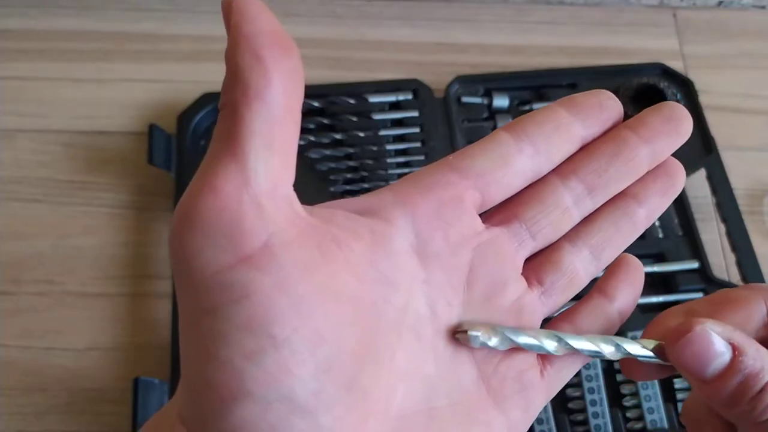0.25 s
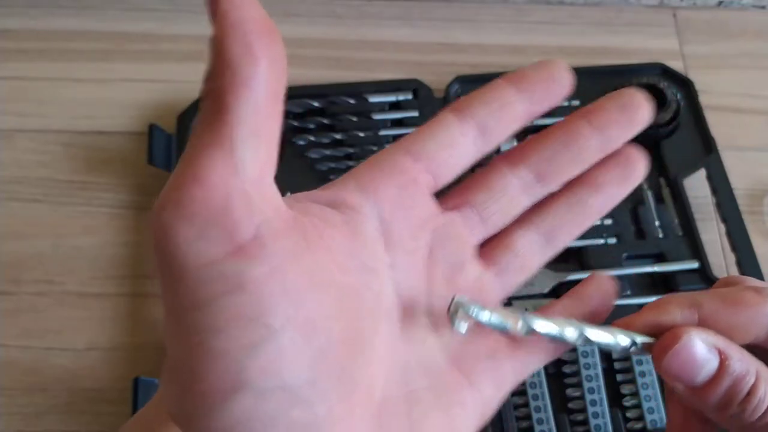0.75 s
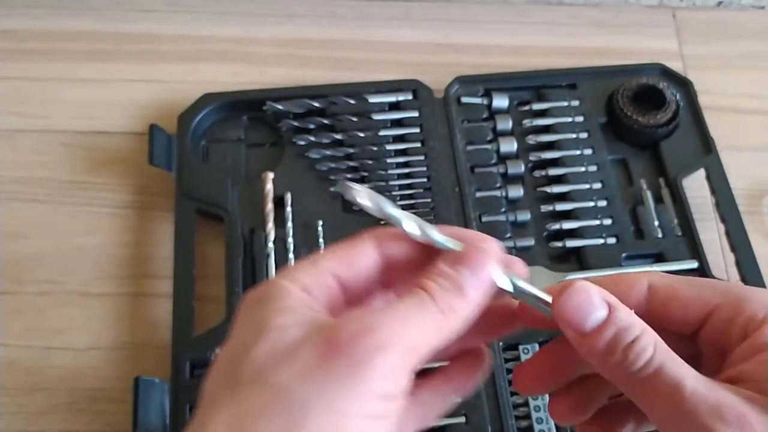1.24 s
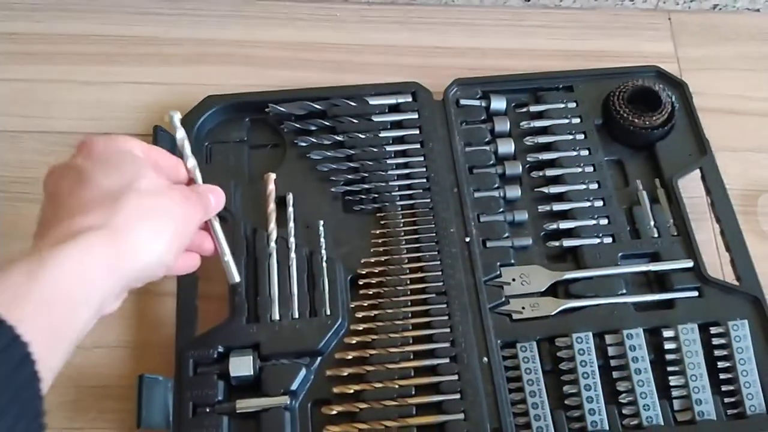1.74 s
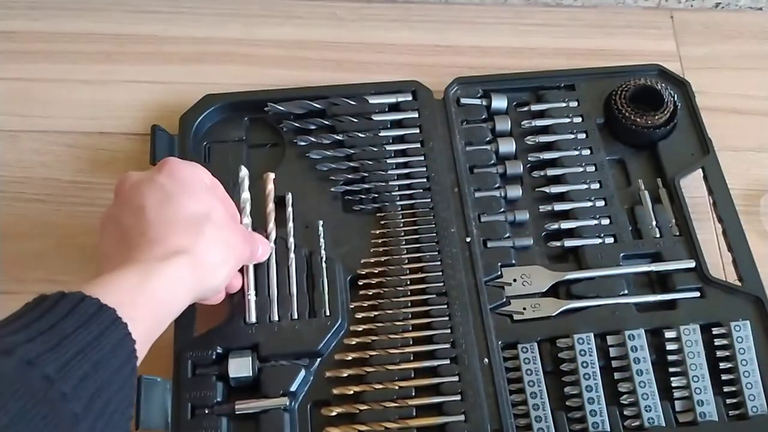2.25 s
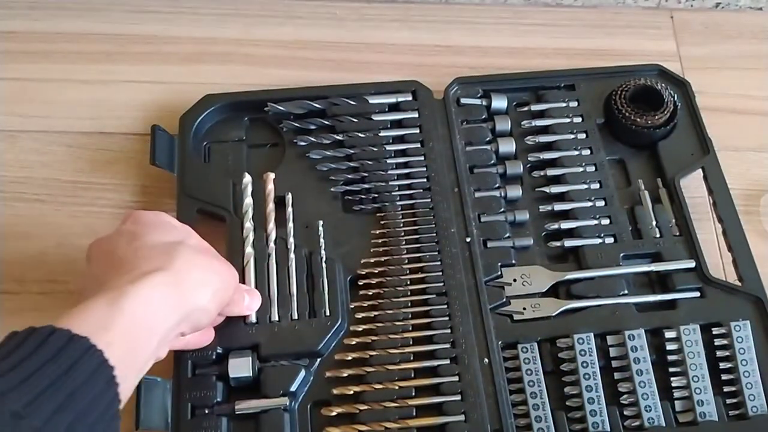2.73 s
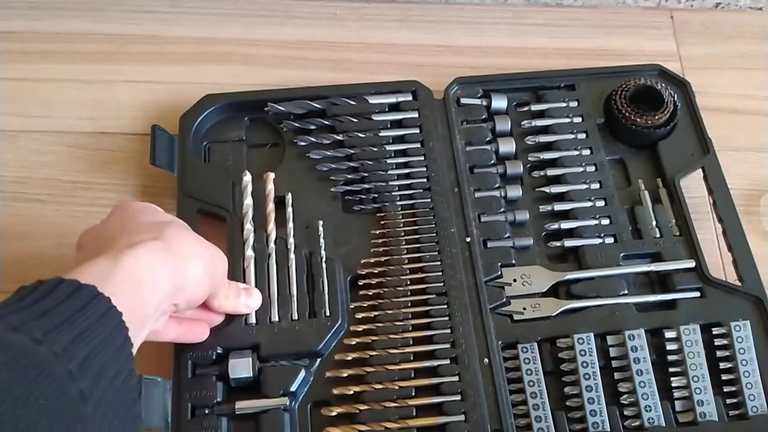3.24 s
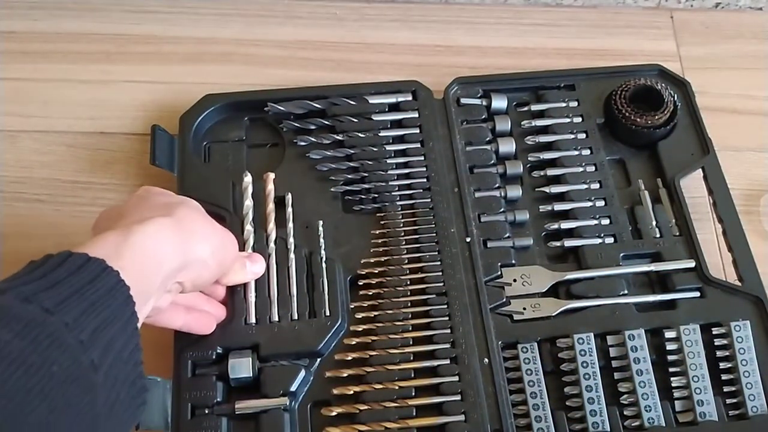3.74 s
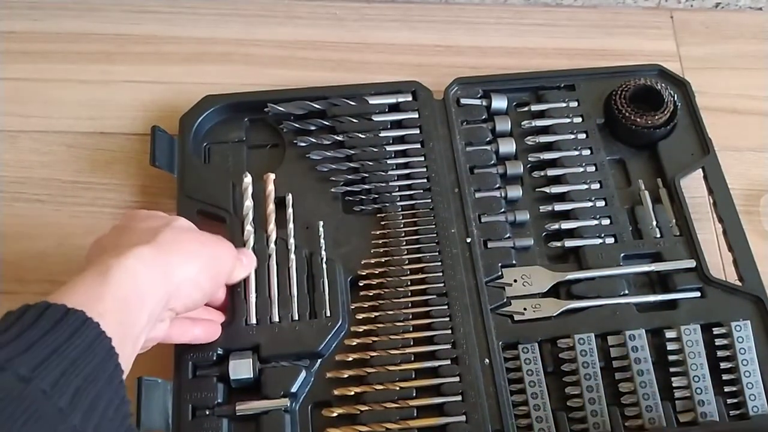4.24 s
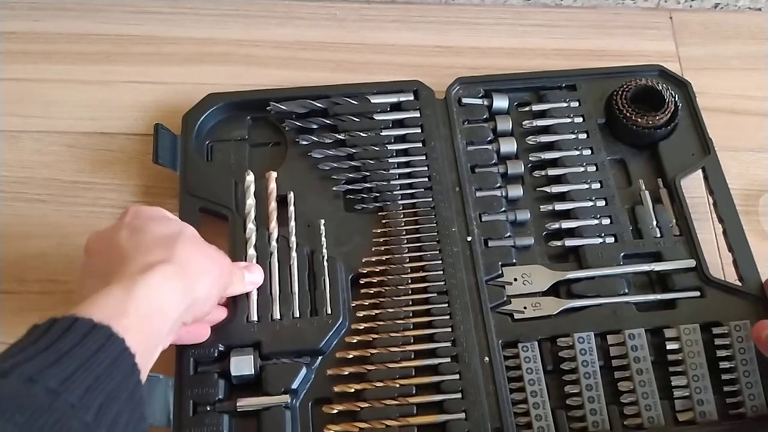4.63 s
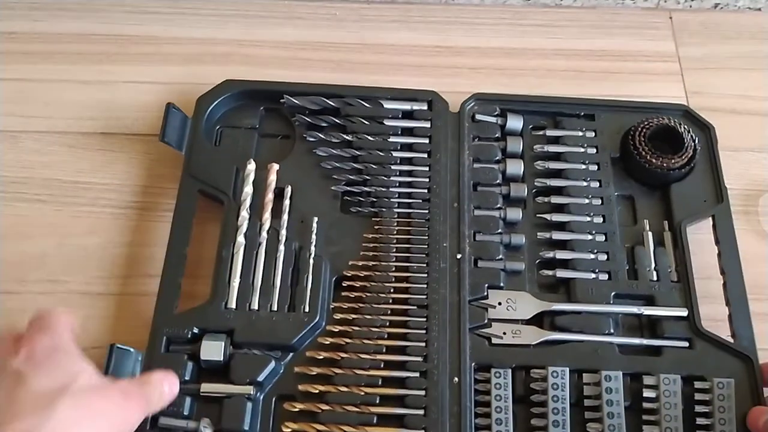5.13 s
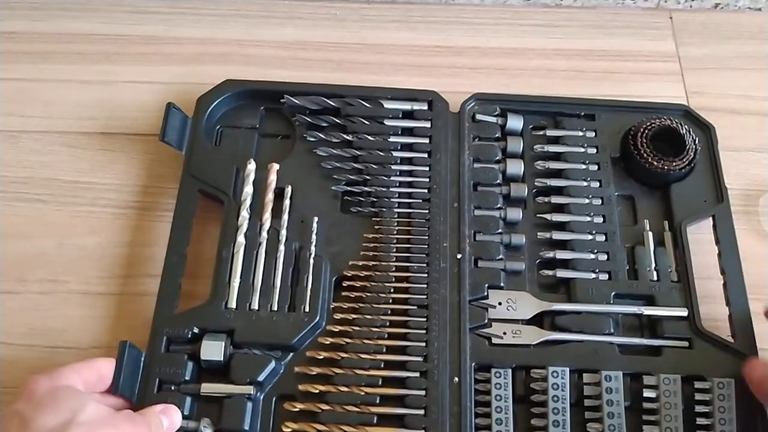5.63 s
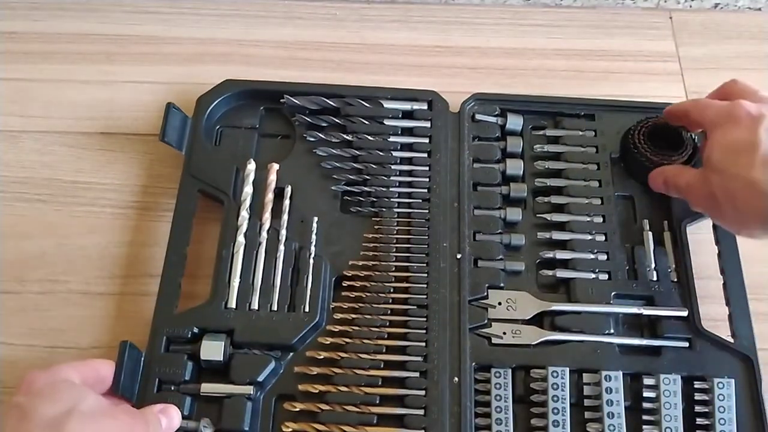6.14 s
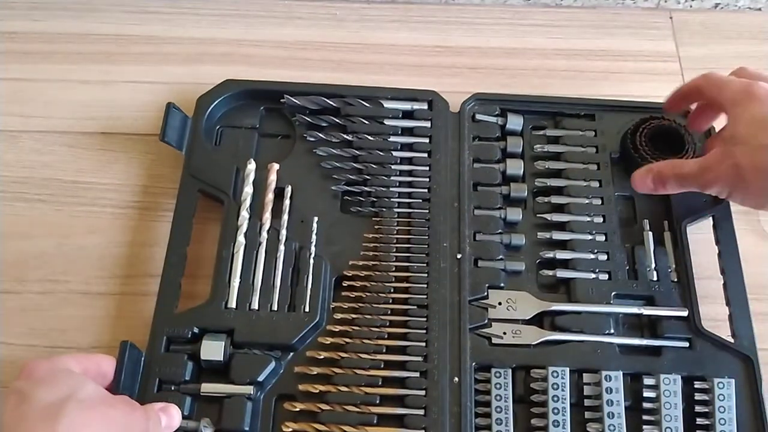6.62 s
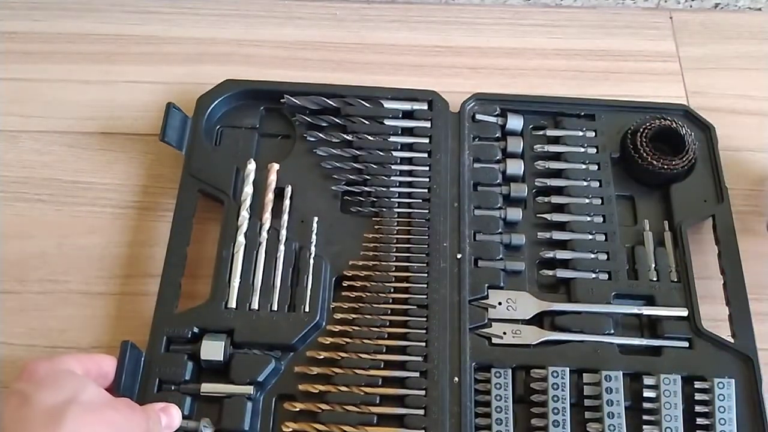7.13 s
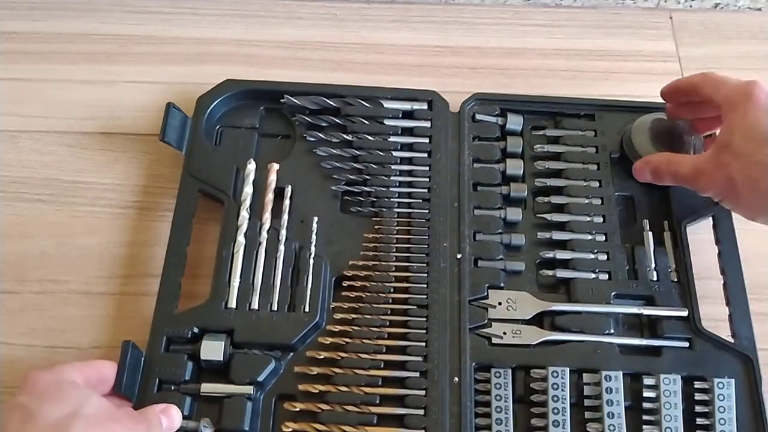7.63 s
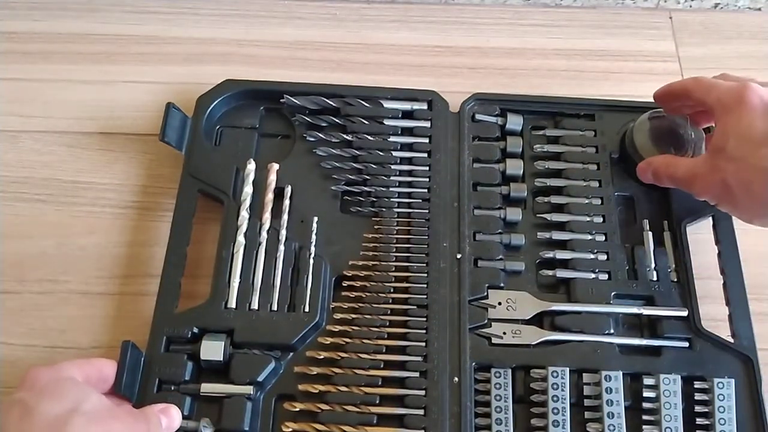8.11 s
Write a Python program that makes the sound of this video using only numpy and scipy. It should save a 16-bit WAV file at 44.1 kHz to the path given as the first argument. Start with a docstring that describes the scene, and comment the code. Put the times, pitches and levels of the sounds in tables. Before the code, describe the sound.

A quiet hard room with soft broadband noise and a thin treble hiss, heard close in stereo. Around 1 second skin brushes very faintly. At 2.0 a steel bit knocks lightly on a hollow plastic case; at 2.3 a firmer cluster of plastic clacks; at 3.0 one loud, bright snap into the clip, with a low floor thud and a short room tail. From 3.4 to 4.8 there are faint rubs while low fluttering air gusts buffet almost only the left side, strongest near 4.2 to 4.6. From 4.8 to 5.2 the case drags over boards with a grainy, hissy scrape. Soft brushing and small ticks follow, busiest at 6.2 to 6.7. From 7.04 a light cap taps with dull hollow tones; at 7.6 it touches again, slides, clicks clearly at 8.03, and gives a last sharp tick at 8.35.

```python
"""A quiet hard room with a thin treble hiss; skin and plastic brush softly over a hollow case.
A steel bit is laid into the case on a wooden floor and snapped into its clip: banks of decaying modes.
Bass gusts buffet almost only the left microphone port; the case drags over boards as grainy noise.
Last a small cap is fitted onto a ring of cutters: ticks, rim modes and pitched air in the cup.
The room answers with noise tails that die band by band."""
import sys
import numpy as np
from scipy import signal
from scipy.fft import rfft, irfft, next_fast_len
from scipy.io import wavfile
from scipy.ndimage import uniform_filter1d

SR = 44100
rng = np.random.default_rng(int(sys.argv[2]) if len(sys.argv) > 2 else 0)


def to_wav(sig):
    """Store sig (one row per channel, or 1-D mono) as 16-bit WAV at the path in sys.argv[1].

    Samples outside -1..1 are clipped; the rate is SR.
    """
    pcm = np.clip(np.atleast_2d(sig), -1, 1) * 32767
    pcm = np.round(pcm).astype(np.int16)
    wavfile.write(sys.argv[1], SR, pcm.T)  # frames by channels


N = 369116

# steady room noise: pitch_hz, density_db (relative, per Hz)
QUIET = [(20, 10), (32, -7.5), (44, -13.5), (60, -5.5), (95, -14), (155, -7), (195, -25.5), (250, -2.5),
         (300, -16.5), (420, -19), (700, -25), (1400, -30), (3500, -35), (7000, -38.5), (13000, -37),
         (16000, -45.5)]
# strokes of skin and plastic over the case: start_s, hold_s, hiss_db, wall_db
RUBS = [(1.0, .06, -69, -100), (1.18, 0.062, -69, -96), (2.09, 0.037, -66, -84), (2.8, 0.035, -56.5, -71),
        (3.4, 0.073, -59, -73), (3.57, 0.023, -80, -66), (4.205, 0.025, -59, -62.5),
        (4.262, 0.031, -60, -58), (4.62, 0.0084, -55.5, -77), (4.64, 0.033, -49, -58.5),
        (4.69, .02, -62, -62), (4.725, 0.01, -55, -70), (4.76, 0.03, -64, -67), (5.275, 0.095, -62, -63.5),
        (5.43, 0.093, -69, -67.5), (5.62, 0.13, -63.5, -72), (5.81, 0.079, -56, -89),
        (5.98, 0.041, -67.5, -73), (6.24, 0.016, -47, -52), (6.28, 0.02, -56, -53.5),
        (6.36, 0.0096, -57, -57.5), (6.435, 0.0078, -54, -77), (6.455, 0.033, -51.5, -56.5),
        (6.51, 0.04, -53, -79), (6.65, 0.049, -60.5, -77.5)]
# case dragged over the boards, breakpoints: time_s, hiss_db, wall_db
DRAGGING = [(4.785, -54, -63), (4.82, -46.5, -66), (4.855, -39, -63), (4.876, -38.5, -75), (4.92, -42, -63),
            (4.97, -40.5, -51.5), (5.03, -41, -55.5), (5.081, -43.5, -50), (5.129, -46.5, -56.5),
            (5.17, -73, -70)]
# slides of the cap in the fingers and over the teeth: start_s, hold_s, hiss_db, cup_db, cup_air_hz
SLIDES = [(7.047, 0.018, -63, -62, 1983), (7.089, 0.023, -87, -62.5, 1810),
          (7.586, 0.013, -60.5, -72.5, 1490), (7.641, 0.024, -66, -48, 1593),
          (7.888, 0.044, -62.5, -58.5, 1450), (7.918, 0.04, -76.5, -57, 1445),
          (7.998, 0.04, -73, -60, 1444), (8.083, 0.053, -87, -61, 1498), (8.209, 0.022, -59.5, -56.5, 1354),
          (8.264, 0.058, -64.5, -61.5, 1350), (8.352, 0.016, -64, -50, 1454)]
# friction hiss: pitch_hz, density_db (relative, per Hz)
HISS = [(1500, -1.5), (2500, -0.5), (4000, -4), (6000, -3), (8000, -1), (11000, 3), (13500, -2),
        (16000, -16)]
# case wall driven by friction: pitch_hz, density_db (relative, per Hz)
DRAG = [(120, -42), (200, -11.5), (346, -13.5), (379, 17), (531, -37), (1130, -15), (1320, -14.5),
        (2440, -16.5), (4500, -60), (5850, -65.5), (9900, -120)]
# bit, fingers and loose tools against the case:
# start_s, tick_db, steel_db, clip_db, edge_db, wall_db, hollow_db, left_minus_right_db
KNOCKS = [(1.9907, -44, -44, -33.5, -25, -41, -36.5, 0.5), (1.9925, -63, -53, -26, -39, -29, -60, -3.5),
          (1.9955, -62, -52, -29, -45, -26, -57, 2), (2.003, -60, -62, -43, -37, -40, -61, -2),
          (2.010, -51, -56, -51, -52, -50, -39.5, 3), (2.039, -51, -66, -47, -42, -40, -42, 1),
          (2.048, -58, -62, -53, -55, -38, -52, -5), (2.11, -49, -65, -62, -64, -63, -70, -3),
          (2.165, -52, -65, -44.5, -46, -28, -39, -0.5), (2.1852, -68, -70, -66, -66, -42, -55, -2),
          (2.3224, -32, -51, -46, -32, -52, -30.5, 6), (2.3242, -47, -54, -26, -36, -32, -35.5, 5),
          (2.3262, -26.5, -38, -24.5, -20, -26.5, -25, 1.5),
          (2.3302, -55, -60, -31, -26.5, -23.5, -35.5, 1), (2.340, -41, -49, -27.5, -25.5, -51, -54.5, 0.5),
          (2.3547, -57, -56, -42, -35, -23, -35.5, -2), (2.387, -59, -57, -44, -31.5, -35, -34.5, 0),
          (2.803, -50, -67, -53, -62, -78, -57, 2), (2.996, -9.5, -10, -9.5, -8, -15.5, -24.5, -3),
          (2.9992, -33, -28, -22.5, -20, -14.5, -69, -5), (3.0035, -34, -22, -20, -25, -16.5, -39.5, -4),
          (3.0115, -18.5, -27.5, -31, -40, -47, -70, -12), (3.0155, -28, -27.5, -32, -45, -38, -67, 0),
          (3.025, -26, -29.5, -29, -30, -31, -35.5, 4), (3.4625, -39.5, -75, -74, -69.5, -55, -65.5, 4),
          (3.583, -61, -56, -68, -68.5, -71, -76, 13.5), (4.1748, -51, -58, -60.5, -61, -79, -61.5, 9),
          (4.259, -50, -55, -60.5, -50, -48, -72, -6), (4.287, -48, -62, -70.5, -70, -66.5, -73.5, 4),
          (4.367, -59, -64, -79, -69, -72, -72, -5), (4.8683, -29.5, -33, -37, -37, -43, -54, 1),
          (5.2095, -42, -56, -52, -56, -57, -59, 2.5), (5.2754, -50, -64, -65, -51, -78, -59, 1),
          (6.119, -53, -62, -47.5, -47, -44.5, -59, 2.5), (6.2118, -50, -69, -72, -71, -68, -73, 3),
          (6.235, -47, -57, -54, -54, -53, -53, 2), (6.2461, -40.5, -63, -66, -61, -38, -57, -2),
          (6.2835, -53, -52, -47, -47, -40, -64, 0.5), (6.415, -53, -70, -72, -73, -75, -75, 0),
          (6.4827, -30, -64, -67, -52, -63, -68, 1), (6.612, -41.5, -52, -56, -52.5, -55, -59.5, 3),
          (6.7055, -51, -79, -73.5, -68, -79, -64, 3)]
# case pushed against the boards: start_s, level_db
THUDS = [(1.998, -42), (2.17, -50), (2.327, -27.5), (2.36, -39), (3.0, -24.5), (3.022, -38)]
# gusts on the ports, before the left/right gains: start_s, hold_s, throb_db, flutter_db
GUSTS = [(3.44, 0.064, -51, -57), (3.55, 0.0083, -54, -61), (3.585, 0.0076, -52, -54.5),
         (3.65, .02, -49, -60), (3.705, 0.0096, -52, -48), (3.76, 0.017, -52, -65),
         (3.845, 0.011, -52, -46), (3.868, 0.019, -47, -35), (3.925, .012, -44, -49.5),
         (3.97, 0.011, -58, -53), (4.02, 0.14, -53, -63), (4.195, 0.0092, -52, -50),
         (4.242, 0.012, -36.5, -36.5), (4.285, .006, -50, -47), (4.318, 0.01, -38, -40.5),
         (4.345, 0.038, -43.5, -42), (4.405, 0.015, -43, -51), (4.475, 0.057, -46, -40),
         (4.56, 0.023, -46.5, -45), (4.6, 0.032, -42, -42.5), (4.7, 0.015, -41, -62),
         (4.748, 0.0056, -49, -42.5), (4.79, 0.015, -50, -42.5), (4.83, .008, -46, -68),
         (6.766, 0.0065, -53.5, -72)]
# taps of the cap: start_s, tick_db, rim_db, cup_db, cup_air_hz, left_minus_right_db
TAPS = [(7.043, -54, -62.5, -42, 1557, 5), (7.05, -54.5, -65, -45, 1535, -1),
        (7.0561, -52.5, -68, -40, 1575, 9), (7.062, -52, -64, -44, 1480, 0),
        (7.072, -61, -66.5, -50, 1470, 1), (7.078, -58, -56, -49, 1560, 4),
        (7.629, -56, -55, -38.5, 1477, 5), (7.6463, -28, -54, -34.5, 1606, 2),
        (7.6525, -36, -39, -33.5, 1536, -1), (7.656, -44, -44, -43, 1500, 1),
        (7.7238, -50, -67, -42, 1496, 5), (7.7805, -67, -72, -50, 1550, 2), (7.882, -51, -70, -52, 1470, 4),
        (7.9026, -60, -77, -53.5, 1460, 2), (7.9235, -36.5, -62, -50, 1390, 6),
        (7.953, -45, -63, -53, 1452, 2), (7.998, -38, -46, -53, 1490, 3), (8.0101, -44, -57, -41, 1400, 3),
        (8.0316, -22.5, -28, -33.5, 1274, 4.5), (8.048, -39, -40, -58, 1334, -1),
        (8.05, -47, -52, -58, 1320, 0), (8.085, -60, -60, -59, 1420, 0), (8.114, -60, -60, -52, 1510, 6),
        (8.212, -58, -68, -50, 1390, 6), (8.242, -72, -72, -50, 1270, 2), (8.275, -66, -72, -57, 1332, 2),
        (8.297, -68, -70, -53, 1307, 2), (8.323, -67, -78, -55, 1300, 0), (8.349, -26, -44.5, -38, 1436, 2),
        (8.358, -45, -62, -56, 1500, 0), (8.3645, -35, -68, -68, 1490, -3)]

# Mode tables from STEEL to RIM: base_hz (sounds at MODE_SCALE times this), level_db, t60_s
MODE_SCALE = 0.96
# steel bit in its seat: base_hz, level_db, t60_s
STEEL = [(5190, 2.5, 0.0056), (5640, -14.5, 0.012), (6550, 4, 0.0039), (7500, -18, 0.0058),
         (8500, -12, 0.013), (9400, -2, 0.0057), (10020, -8, 0.0097)]
# clips: base_hz, level_db, t60_s
CLIP = [(2754, -9, 0.0082), (2848, 3.5, 0.0079), (3200, 7.5, 0.0035), (3920, -10, 0.0058),
        (4100, -35, 0.0041), (4650, -2, 0.0059)]
# stiff edges: base_hz, level_db, t60_s
EDGE = [(1439, 6, 0.011), (1610, -4, 0.005), (1816, 7.5, 0.01), (2110, 2, 0.012), (2370, -0.5, 0.015)]
# case wall: base_hz, level_db, t60_s
WALL = [(607.7, -4, 0.044), (712, -2.5, 0.015), (824, -1.5, 0.022), (965, -5, 0.022), (1115, -6, 0.03045),
        (1233, -6.5, .012)]
# hollow of the case: base_hz, level_db, t60_s
HOLLOW = [(262.3, 10.5, 0.028), (292, -5.5, 0.16), (336.7, 4, 0.3), (360.2, -5, 0.22), (404, 1, 0.069),
          (476, -1.5, 0.042)]
# floor boards: base_hz, level_db, t60_s
BOARDS = [(148, -20, 0.05), (182, 2, 0.11), (225, -3.5, 0.072)]
# cap rim: base_hz, level_db, t60_s
RIM = [(2590, 3.5, 0.0077), (2970, -6, 0.0019), (3660, 4, 0.0047), (3990, 1, 0.0069), (4760, -5, .005),
       (5050, 3, 0.0044)]
# cup: multiple of cup_air_hz, level_db, t60_s
CUP = [(0.598, -19, 0.091), (.75, -3.5, 0.022), (0.869, 9.5, 0.0054), (1.0, 12.5, 0.011), (1.12, 1, 0.011),
       (1.27, -4, 0.036)]

# room echo: pitch_hz, t60_s, echo_energy_db
ROOM = [(99, 0.55, -0.5), (293, 1, -8.5), (618, 0.71, 5.5), (1170, 0.49, -2), (2326, 0.67, -1.5),
        (3140, 0.49, 2), (4360, 0.61, 0), (5430, 0.55, -1), (8320, 0.56, -2), (11000, 0.56, -3.5),
        (13200, 0.45, -16.5)]
# port balance: pitch_hz, left_minus_right_db
LEAN = [(60, 2.5), (110, 2.0), (200, -0.5), (380, 1.5), (700, 3), (1290, -0.5), (2380, 0.5), (4400, 0),
        (8120, -2.5), (15000, 5.5)]
# likeness of the ports: pitch_hz, left_right_correlation
LIKENESS = [(60, 0.92), (180, 0.93), (550, 0.43), (1650, -0.018), (4970, -0.067), (15000, 0.031)]
EDGES_HZ = 20 * 2 ** np.arange(0, 10.1, 1 / 3)   # third octaves
SIDES = np.array([[.5], [-.5]])   # left, right share of a level difference
CROWD = np.array([-1, 0, 1])   # every listed mode has a close neighbour on either side

QUIET_DB = -53
THIN_HISS_HZ, THIN_HISS_WIDTH_HZ, THIN_HISS_DB = 5840, 460, -74
STROKE_RISE_DB_S, STROKE_FALL_DB_S = 900, 542
GUST_RISE_DB_S, GUST_FALL_DB_S = 800, 384
FLUTTER_EVEN_S = 0.029   # flutter strength is evened over this time; the gusts shape it
LEFT_LATE_NEAR_SAMPLES, LEFT_LATE_FAR_SAMPLES = 5, -4   # negative: left hears first
REACH_OVER_S = 4.5   # from then on the hands work on the far half
APART_HZ = 7000   # scales the random phase difference between ports with pitch
BLUR_FROM_HZ, BLUR_RMS_HZ = 690, 260
TREBLE_PEAK_HZ, TREBLE_PEAK_WIDTH_HZ, TREBLE_PEAK_DB = 9220, 2360, -3
TREBLE_DROP_HZ, TREBLE_DROP_DB = 11600, -10
CUTOFF_HZ = 15900


def from_db(db):
    """Decibels to amplitude."""
    return 10 ** (np.asarray(db) / 20)


def rms_one(x):
    """Scale to rms 1."""
    return x / np.sqrt(np.mean(x ** 2) + 1e-20)


def at_hz(points, hz):
    """Second column interpolated over log pitch."""
    points = np.array(points)
    return np.interp(np.log(hz), np.log(points[:, 0]), points[:, 1])


def band(x, low_hz, high_hz, order=2):
    """Butterworth band-pass."""
    sos = signal.butter(order, [low_hz, high_hz], "band", fs=SR, output="sos")
    return signal.sosfilt(sos, x + 1e-18)


def stereo_bands(size):
    """Third-octave noise; mid and side mixed to the likeness of the spaced ports."""
    white = rng.standard_normal((2, 2, size))
    for k, (low_hz, high_hz) in enumerate(zip(EDGES_HZ, EDGES_HZ[1:])):
        mid, side = band(white[k % 2], low_hz, high_hz)
        hz = np.sqrt(low_hz * high_hz)
        alike = np.clip(at_hz(LIKENESS, hz), -1, 1)
        yield hz, np.sqrt(1 + alike) * mid + np.sqrt(1 - alike) * side * 2 * SIDES


def coloured(bands, spectrum):
    """Bands weighted by a spectrum and the port balance; rms 1."""
    total = 0
    for hz, noise in bands:
        total = total + from_db(at_hz(spectrum, hz) + SIDES * at_hz(LEAN, hz)) * noise
    return rms_one(total)


def quiet():
    """Steady broadband room noise plus a thin treble hiss."""
    low_hz = THIN_HISS_HZ - THIN_HISS_WIDTH_HZ / 2
    high_hz = THIN_HISS_HZ + THIN_HISS_WIDTH_HZ / 2
    thin_hiss = rms_one(band(rng.standard_normal((2, N)), low_hz, high_hz))
    room_noise = coloured(stereo_bands(size=N), QUIET)
    return from_db(QUIET_DB) * room_noise + from_db(THIN_HISS_DB) * thin_hiss


def swells(rows, rise_db_s, fall_db_s):
    """Each row swells, holds and fades linearly in dB; its two dB columns give two gains."""
    t, gains = np.arange(N) / SR, np.zeros((2, N))
    for s, hold_s, *db in rows:
        near = slice(int(max(s - .3, 0) * SR), int((s + hold_s + .4) * SR))
        before_db = rise_db_s * (s - t[near])
        after_db = fall_db_s * (t[near] - s - hold_s)
        loss_db = np.maximum(np.maximum(before_db, after_db), 0)
        gains[:, near] += from_db(np.array(db[:2])[:, None] - loss_db)
    return gains


def drag_gains():
    """The drag's hiss and wall gains, interpolated in dB, silent outside the table."""
    t = np.arange(N) / SR
    s, *columns = np.transpose(DRAGGING)
    fade = np.clip(np.minimum(t - s[0], s[-1] + .01 - t) / .02, 0, 1)
    return np.array([fade * from_db(np.interp(t, s, db)) for db in columns])


def cup_friction():
    """Random catches ring the air in the cup briefly at its gliding pitch; rms 1."""
    s, *_, cup_hz = np.transpose(SLIDES)
    turns = np.cumsum(np.interp(np.arange(N) / SR, s, cup_hz)) / SR
    catches = rng.standard_normal(N) * np.exp(2j * np.pi * rng.random(N))
    catches = catches * (rng.random(N) < 800 / SR)   # about 800 per second
    dying = signal.lfilter([1], [1, -np.exp(-np.pi * 210 / SR)], catches)
    ring = rms_one(np.real(dying * np.exp(2j * np.pi * turns)))
    return np.array([np.roll(ring, LEFT_LATE_FAR_SAMPLES), ring])


def rubbing():
    """Friction noise made uneven by surface grain; it also drives the wall or the air in the cup."""
    bands = list(stereo_bands(size=N))
    hiss, wall = swells(RUBS, STROKE_RISE_DB_S, STROKE_FALL_DB_S) + drag_gains()
    cap_hiss, cup = swells(SLIDES, STROKE_RISE_DB_S, STROKE_FALL_DB_S)
    grain = from_db(2.6 * rms_one(band(rng.standard_normal(N), 25, 700, order=1)))
    friction = (hiss + cap_hiss) * coloured(bands, HISS)
    wall_noise = wall * coloured(bands, DRAG)
    return grain * (friction + wall_noise) + cup * cup_friction()


def blurred(x):
    """The room's feed: higher rings are blurred in pitch by random wobble, so echoes are smooth."""
    size = next_fast_len(N)
    hz = np.fft.rfftfreq(size, 1 / SR)
    share = 1 / (1 + (BLUR_FROM_HZ / (hz + 1)) ** 4)
    high = signal.hilbert(irfft(rfft(x, size) * share, size))[:N]
    wobble_hz = BLUR_RMS_HZ * rms_one(band(rng.standard_normal(N), 40, 360, order=1))
    wobbling = np.real(high * np.exp(2j * np.pi * np.cumsum(wobble_hz) / SR))
    return x - high.real + wobbling


def room(x):
    """Echoes as noise that dies exponentially band by band, after a 0.67 ms fade-in."""
    t, tail = np.arange(SR) / SR, 0
    for hz, noise in stereo_bands(size=SR):
        t60_s = at_hz(ROOM, hz)
        echo_db = at_hz(np.array(ROOM)[:, ::2], hz)
        per_energy = np.sqrt(np.log(1000) / t60_s / SR)
        tail = tail + noise * from_db(echo_db - 60 * t / t60_s) * per_energy
    tail = tail * np.clip(t / 0.00067, 0, 1)
    return signal.fftconvolve(blurred(x.mean(axis=0))[None], tail, axes=1)[:, :N]


def at_ports(s, db, pan_db, late_samples):
    """Clicks in both channels, the left one later by late_samples."""
    clicks, at = np.zeros((2, N)), np.round(s * SR).astype(int)
    clicks[0, at + late_samples], clicks[1, at] = from_db(db + SIDES * pan_db)
    return clicks + 1e-18


def ticks(s, db, pan_db, late_samples, decay_s, low_hz):
    """Hard contact: a few milliseconds of dying high-passed noise, partly shared by the ports."""
    clicks = at_ports(s, db, pan_db, late_samples)
    dying = signal.lfilter([1], [1, -np.exp(-1 / (decay_s * SR))], clicks)
    shared, *own = rng.standard_normal((3, N))
    noise = rms_one(np.array([np.roll(shared, late_samples), shared]) + 1.5 * np.array(own))
    sos = signal.butter(3, low_hz, "high", fs=SR, output="sos")
    return signal.sosfilt(sos, dying * noise)


def strike(s, db, pan_db, modes, late_samples, spacing, crowd_db, rise_s, scale=MODE_SCALE):
    """Each blow rings decaying modes and neighbours: spacing is a pitch share, crowd_db their level."""
    hz, mode_db, t60_s = np.repeat(np.transpose(modes), len(CROWD), axis=1)[:, :, None]
    luck = rng.standard_normal((len(s), 3, len(hz), 1))
    t, out = np.arange(int(t60_s.max() * SR) + 1) / SR, np.zeros((2, N + SR))
    place = np.tile(CROWD, len(modes))[:, None]
    swell = 1 - np.exp(-t / rise_s)
    signs = (-1.) ** np.arange(len(hz))[:, None]
    starts, scales = np.round(s * SR).astype(int), scale + 0 * s
    for at, level_db, lean_db, times, (loud, shift, skew) in zip(starts, db, pan_db, scales, luck):
        turns = hz * times * (1 + spacing * (place + shift / 5)) * t
        ring_db = level_db + mode_db + crowd_db * abs(place) + 1.5 * loud - 60 * t / t60_s
        heights = signs * from_db(ring_db)
        phase = 2 * np.pi * turns + SIDES[:, :, None] * skew * hz / APART_HZ
        ring = np.sum(heights * np.sin(phase), axis=1)
        left, right = from_db(SIDES * lean_db) * swell * ring
        out[0, at + late_samples:at + late_samples + len(t)] += left
        out[1, at:at + len(t)] += right
    return out[:, :N]


def case(rows, late):
    """Tick, steel, clips and edges answer at once, wall and hollow a little later."""
    s, tick_db, steel_db, clip_db, edge_db, wall_db, hollow_db, pan_db = np.transpose(rows)
    return (ticks(s, tick_db, pan_db, late, decay_s=0.0035, low_hz=4250)
            + strike(s, steel_db, pan_db, STEEL, late, spacing=0.026, crowd_db=-1.5, rise_s=0.00014)
            + strike(s, clip_db, pan_db, CLIP, late, spacing=0.043, crowd_db=-1, rise_s=0.00019)
            + strike(s, edge_db, pan_db, EDGE, late, spacing=0.049, crowd_db=-6.5, rise_s=0.00033)
            + strike(s + 0.0017, wall_db, pan_db, WALL, late,
                     spacing=0.055, crowd_db=-9.5, rise_s=0.00037)
            + strike(s + 0.00347, hollow_db, pan_db, HOLLOW, late,
                     spacing=0.0066, crowd_db=-20, rise_s=0.0011))


def boards():
    """The floor under the case answers pushes with low modes."""
    s, db = np.transpose(THUDS)
    return strike(s, db, np.zeros(len(s)), BOARDS, LEFT_LATE_NEAR_SAMPLES,
                  spacing=0.028, crowd_db=-16.0, rise_s=0.0014)


def buffet():
    """Eddies press on the left port, 36 dB less on the right: slow throb and lumpy bass flutter."""
    throb_gain, flutter_gain = swells(GUSTS, GUST_RISE_DB_S, GUST_FALL_DB_S)
    white = rng.standard_normal((3, N))
    lumps = from_db(3.2 * rms_one(band(white[2], 22.6, 31.3, order=1)))
    throb = rms_one(band(white[0], 27.7, 75.0))
    flutter = rms_one(band(lumps * band(white[1], 99, 203), 94, 555, order=3))
    power = uniform_filter1d(flutter ** 2, size=int(FLUTTER_EVEN_S * SR))
    flutter = flutter / np.sqrt(power + 0.27)
    pressure = band(throb_gain * throb + flutter_gain * flutter, 6.4, 1200)
    return pressure * from_db([[6.0], [-30]])   # left, right


def cap():
    """A light cup: tick, rim, and air whose pitch depends on how far the mouth is covered."""
    s, tick_db, rim_db, cup_db, cup_hz, pan_db = np.transpose(TAPS)
    late = LEFT_LATE_FAR_SAMPLES
    return (ticks(s, tick_db, pan_db, late, decay_s=0.0032, low_hz=7500)
            + strike(s, rim_db, pan_db, RIM, late, spacing=0.054, crowd_db=-3, rise_s=0.00012)
            + strike(s, cup_db, pan_db, CUP, late,
                     spacing=0.022, crowd_db=-14.0, rise_s=0.0006, scale=cup_hz))


def scene():
    """All sources at the ports; blows and rubbing also feed the room."""
    knocks = np.array(KNOCKS)
    far = knocks[:, 0] > REACH_OVER_S
    near_knocks = case(knocks[~far], LEFT_LATE_NEAR_SAMPLES)
    far_knocks = case(knocks[far], LEFT_LATE_FAR_SAMPLES)
    blows = near_knocks + far_knocks + boards() + cap()
    blows = band(blows, 93.8, 17900)   # blows carry no deep bass
    rub = rubbing()
    echoes = room(blows + from_db(-2.0) * rub)
    return blows + echoes + rub + buffet() + quiet()


def record(dry):
    """A treble resonance with a steep drop above it; peaks are clipped and the top is cut."""
    low_hz = TREBLE_PEAK_HZ - TREBLE_PEAK_WIDTH_HZ / 2
    high_hz = TREBLE_PEAK_HZ + TREBLE_PEAK_WIDTH_HZ / 2
    x = dry + from_db(TREBLE_PEAK_DB) * band(dry, low_hz, high_hz, order=1)
    hz = np.fft.rfftfreq(N, 1 / SR)
    drop_db = TREBLE_DROP_DB / (1 + np.exp((TREBLE_DROP_HZ - hz) / 300))
    x = irfft(rfft(x) * from_db(drop_db), N)
    # 60 dB stopband begins 900 Hz above the cutoff
    sos = signal.cheby2(12, 60, CUTOFF_HZ + 900, fs=SR, output="sos")
    return signal.sosfilt(sos, np.clip(x, -.85, .85))


dry = scene()
out = record(dry)
to_wav(out)
```